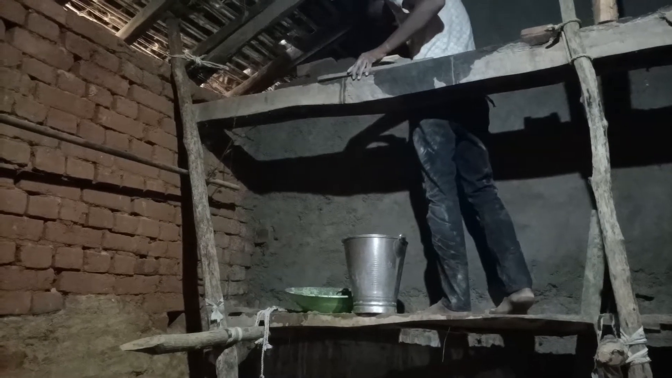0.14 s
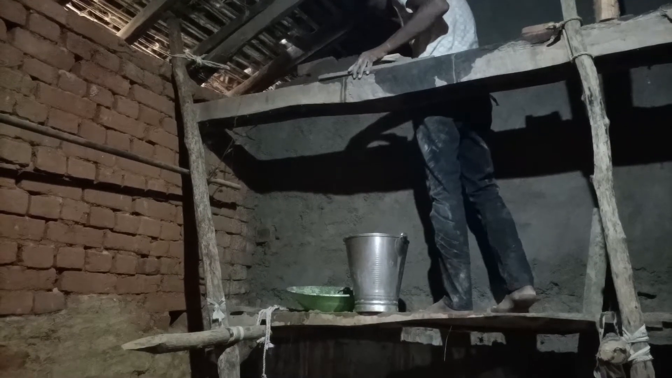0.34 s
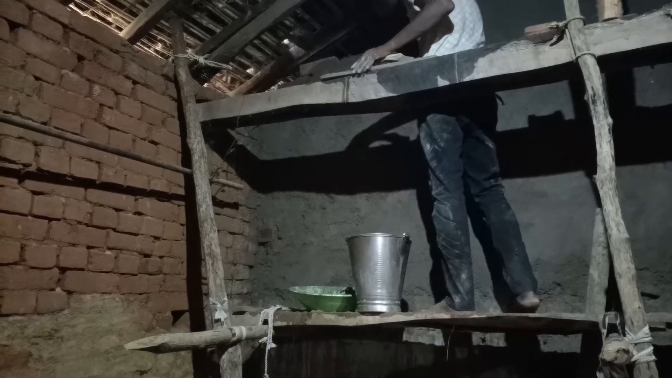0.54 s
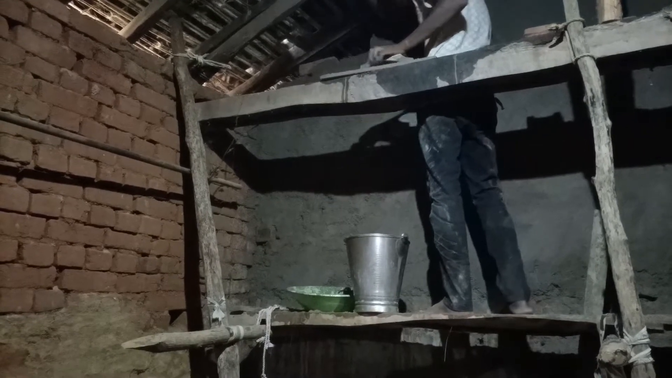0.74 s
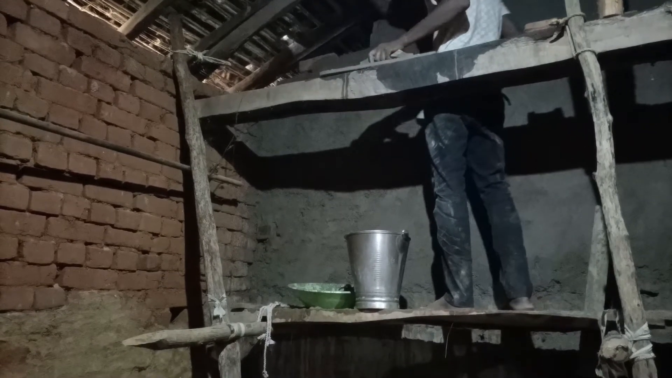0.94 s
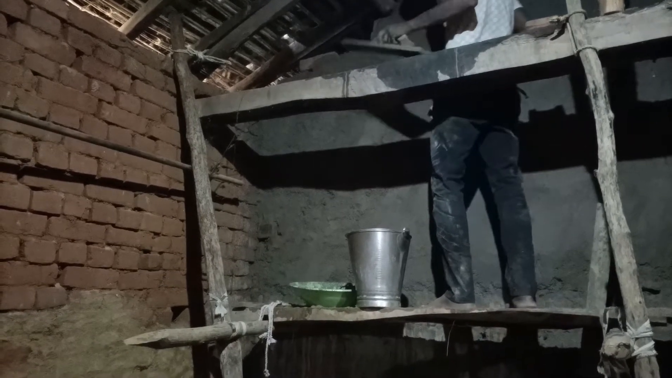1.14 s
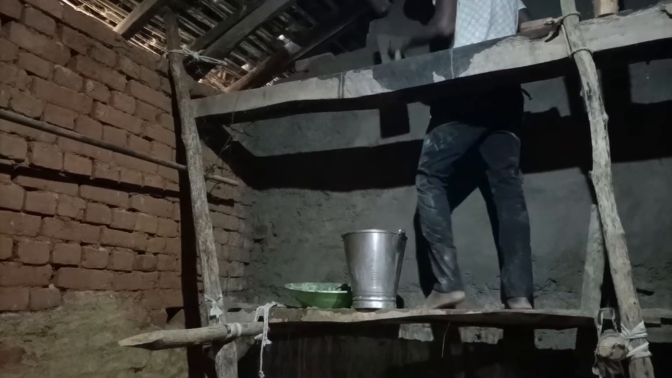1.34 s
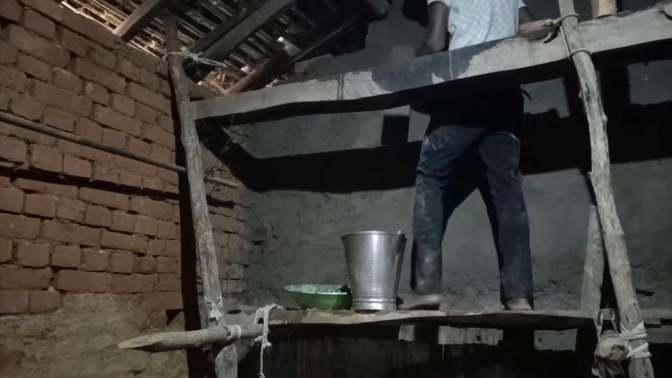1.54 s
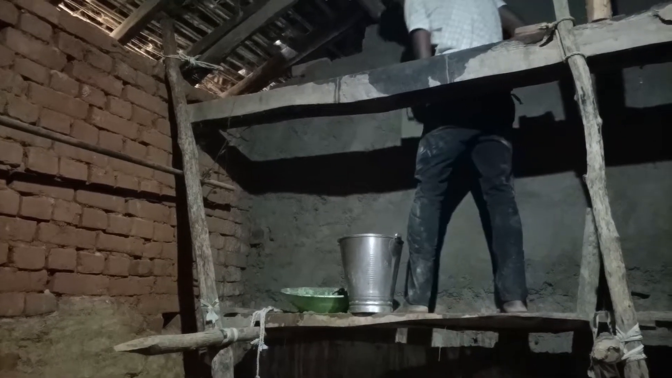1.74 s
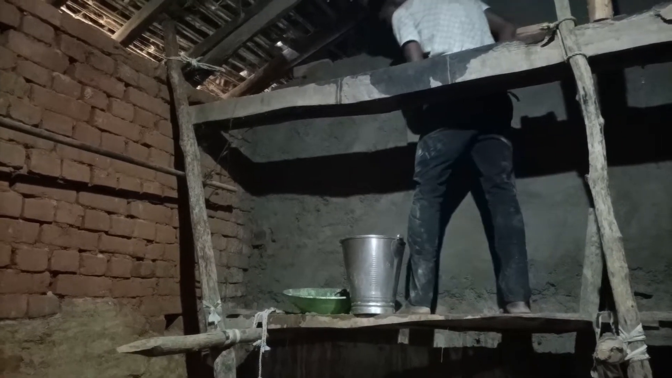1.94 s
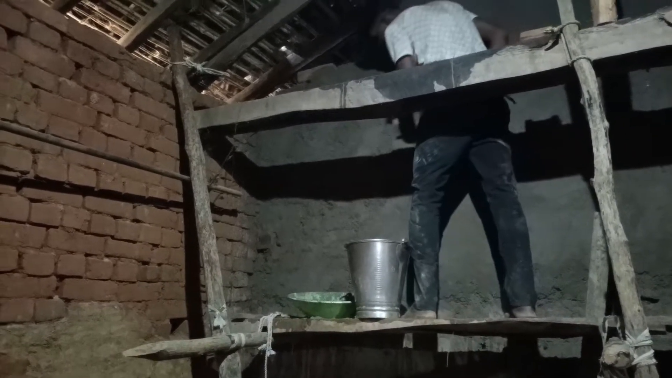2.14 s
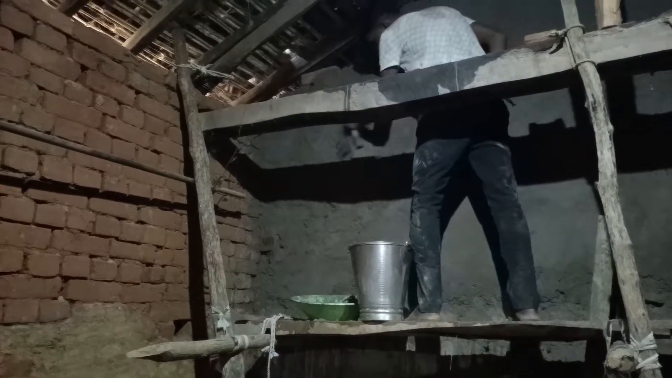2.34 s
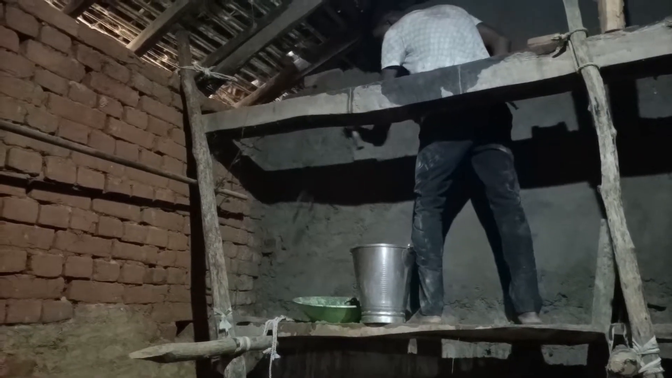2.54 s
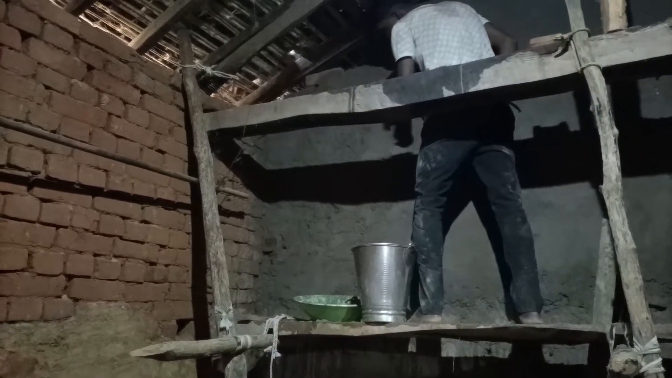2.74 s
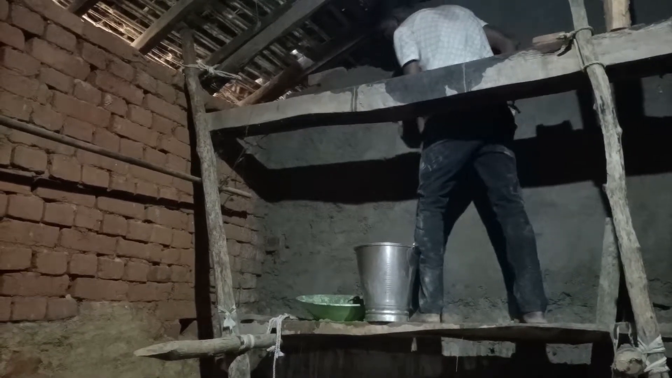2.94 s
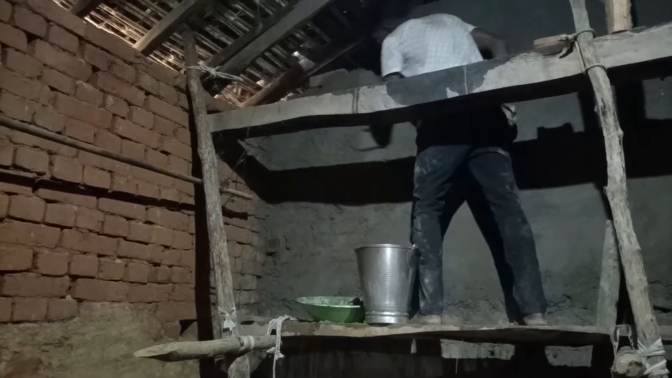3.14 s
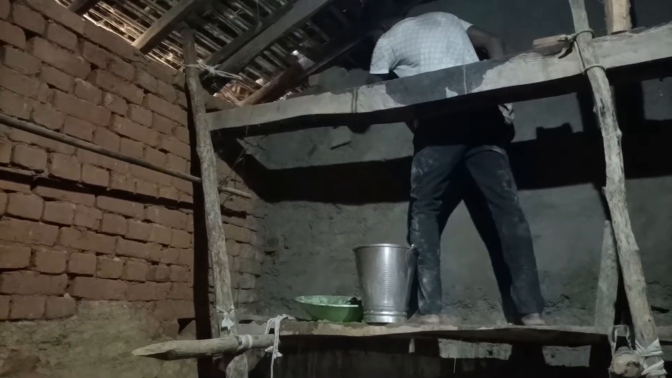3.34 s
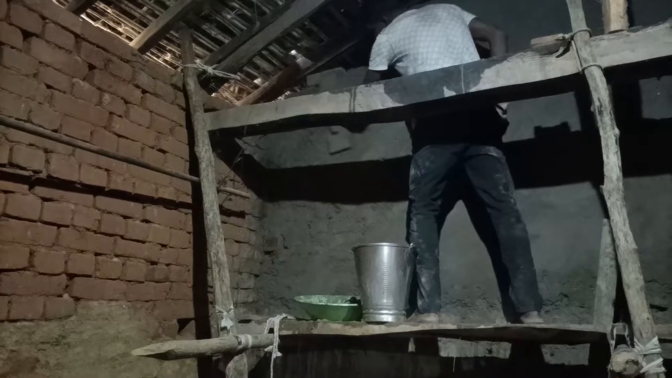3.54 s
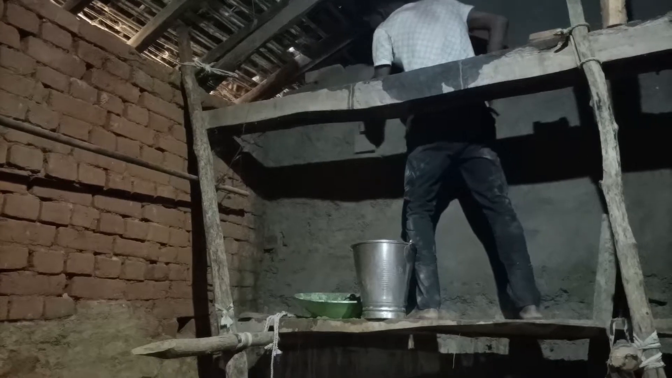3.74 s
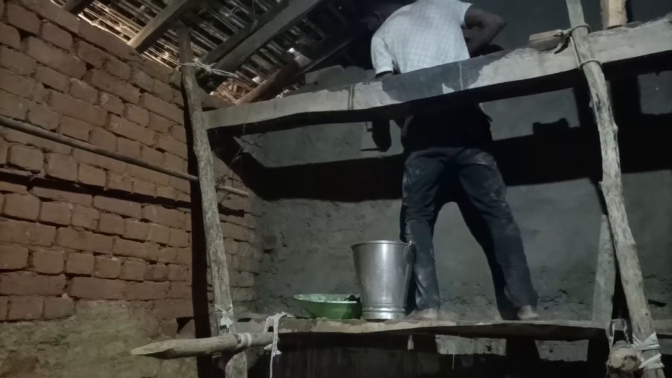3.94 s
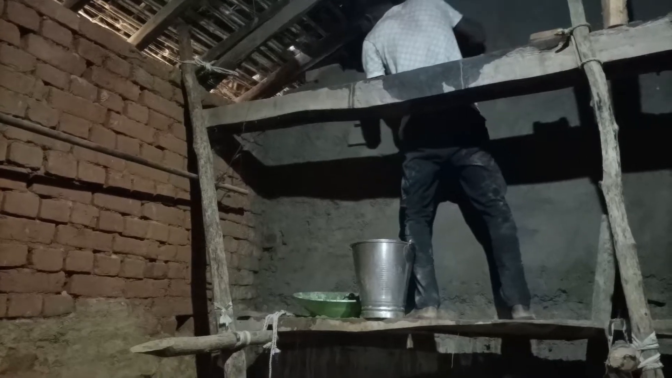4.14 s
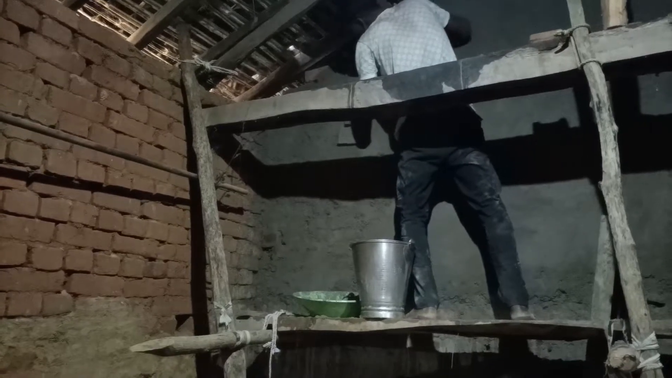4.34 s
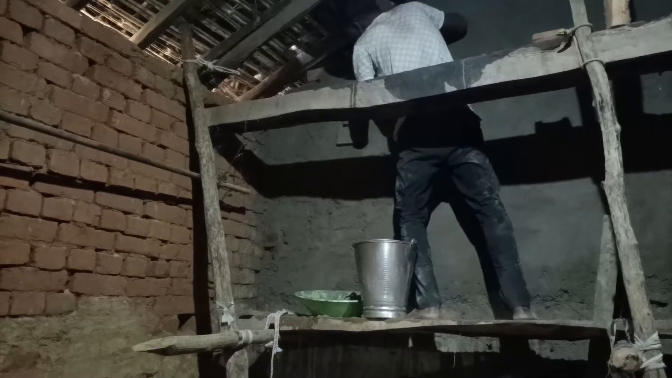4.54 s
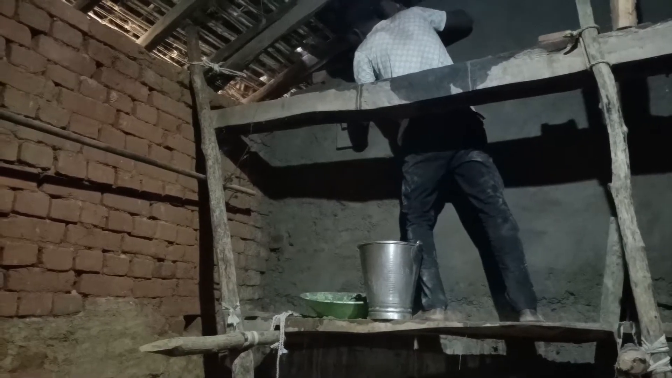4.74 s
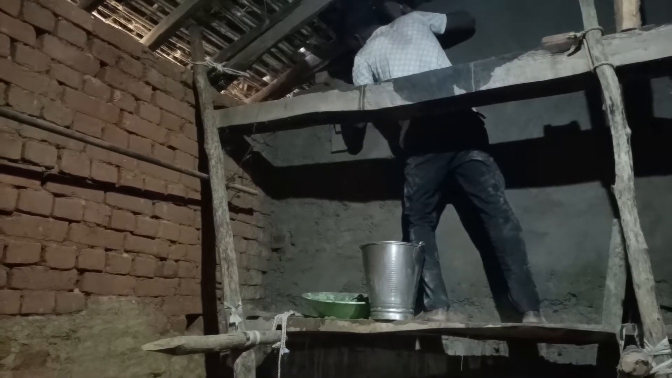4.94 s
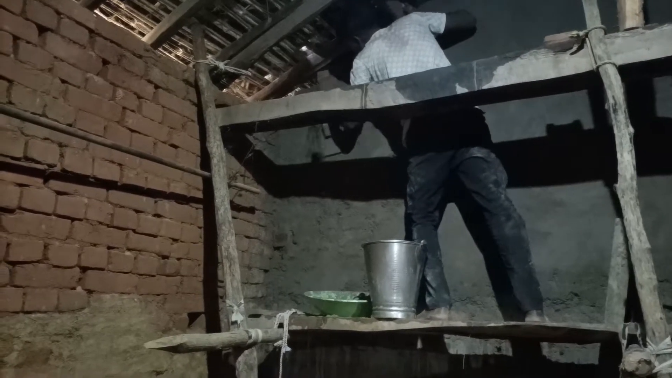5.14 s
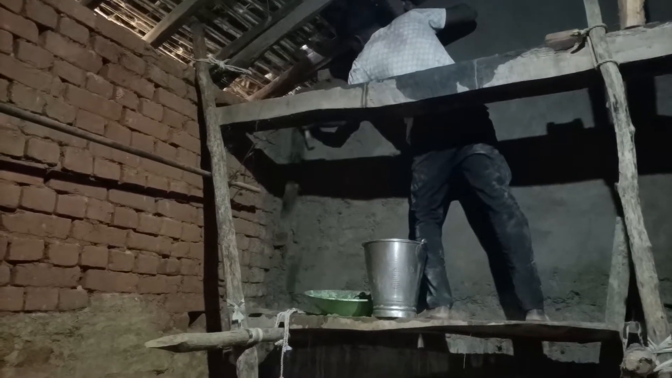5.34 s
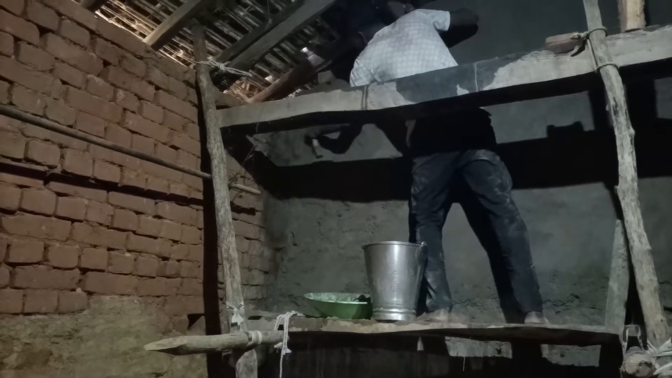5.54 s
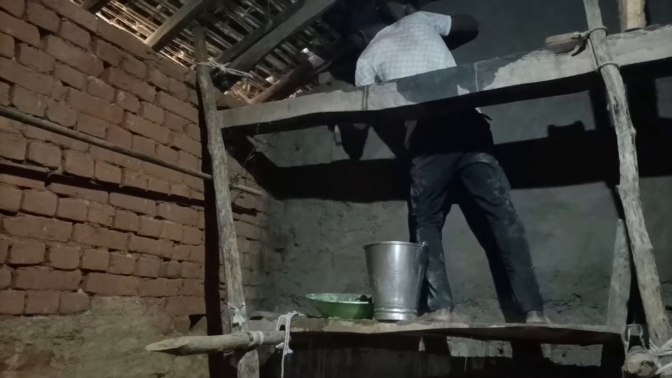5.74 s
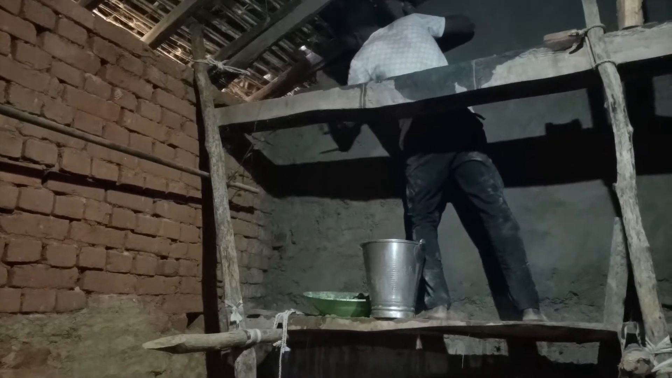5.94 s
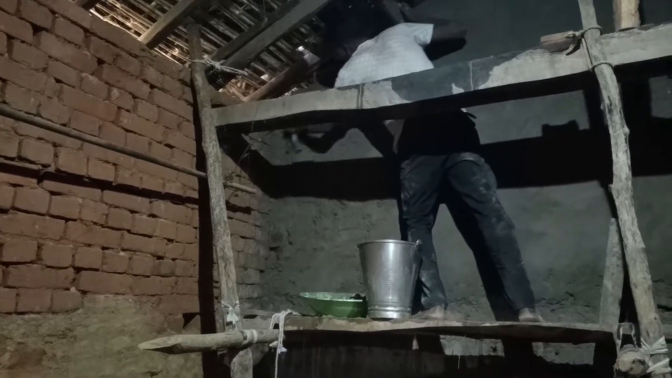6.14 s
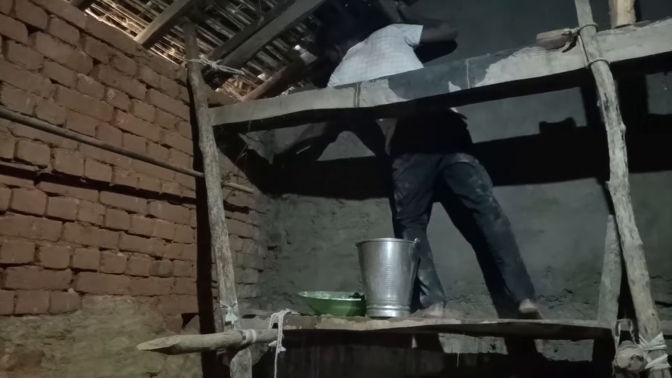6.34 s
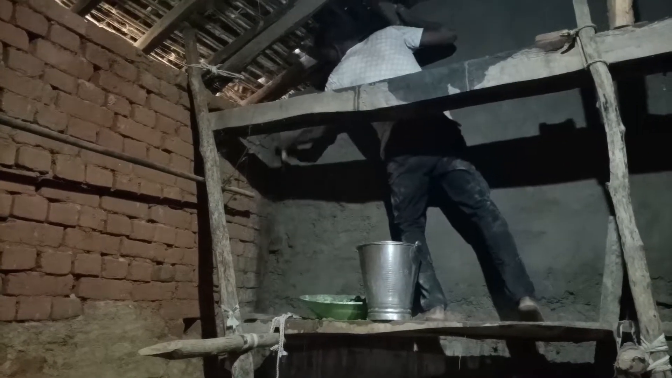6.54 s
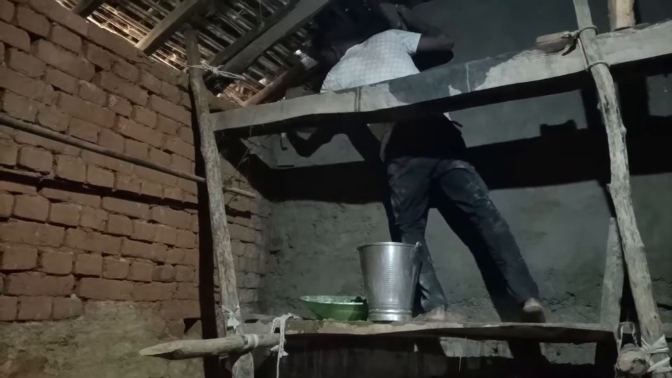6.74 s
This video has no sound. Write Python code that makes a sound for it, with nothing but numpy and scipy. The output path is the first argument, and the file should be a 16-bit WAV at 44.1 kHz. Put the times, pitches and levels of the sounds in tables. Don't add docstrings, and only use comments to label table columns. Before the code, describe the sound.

Light, dry trowel skims open quietly, followed by a small steel ring and faint touches. Then working strokes begin: grainy, mid-bright scraping of wet sand and plaster, with a hard catch at three seconds. Rubbing grows denser and muffled knocks from the concrete ledge cluster around four and six seconds, with fizzing sand on top. Close, fairly dry brick room, stereo pickup, low soft rumble and slight hiss beneath.

```python
import sys
import numpy as np
from scipy import signal
from scipy.io import wavfile
from scipy.ndimage import uniform_filter1d

SR = 44100
rng = np.random.default_rng(int(sys.argv[2]) if len(sys.argv) > 2 else 0)


def bounce(signal):
    frames = np.transpose(np.atleast_2d(signal))
    limited = np.clip(frames, -1, 1)
    pcm = np.round(limited * 32767).astype(np.int16)
    wavfile.write(sys.argv[1], SR, pcm)


def invert_db(x):
    u = np.asarray(x, float) / 20
    return 10 ** u


N = 299439

# start in seconds, peak in dB, fizz in dB re peak,
# body pitch in Hz, body level in dB re peak.
CATCHES = [(0.3013, -36.5, 8.5, 2940, 0), (0.402, -27, -2, 2300.0, -20), (0.623, -44, 2, 2600.0, -6),
           (0.738, -49, 3, 3500, -10), (0.796, -50, 11, 4320, 5), (1.43, -46.5, -27, 1320, 6),
           (1.571, -59, 5, 1580.0, -12), (1.653, -30.5, -8, 1630, 0), (1.8525, -28.5, -9, 2520, 3.5),
           (1.929, -22, -16, 1600.0, -1), (2.9494, -29.5, 16.5, 2405, -10.0),
           (3.009, -12, -14, 2640.0, -27), (3.058, -9.5, -5, 870, -5), (3.785, -30.5, 17.5, 2500, -10),
           (3.89, -35, 12, 2500, -10), (4.0662, -15.5, -12, 2350, -3), (4.5421, -15.5, -14, 1000, -8),
           (4.569, -20, -2, 960, -3), (4.587, -24, -10, 2800, 3), (4.6244, -15, -12, 1300, -2),
           (4.633, -24, -12, 1000, -2), (4.706, -24, -12, 1100, -1), (5.519, -24, 7.5, 4500, 1),
           (5.543, -25, 7, 1150, -4), (5.698, -11, 3.5, 1000.0, -6), (5.8, -16.5, 8.5, 800, -4),
           (5.9214, -18, 10, 810, 5.5), (6.026, -22.5, 9, 2020, 6), (6.08, -22.5, -11.0, 930, 9.5),
           (6.553, -8, -2, 2450.0, -17.0), (6.6195, -21, 5, 2110.0, -5)]
CATCH_T60 = 0.14
# start in seconds, peak in dB, pitch in Hz, t60 in seconds.
THUDS = [(0.112, -39, 337, 0.096), (0.301, -42, 352, 0.048), (0.399, -42.5, 221, 0.072),
         (1.438, -54, 412, 0.6), (1.855, -48, 200, 0.076), (1.968, -37, 145, 0.092),
         (3.06, -21, 435, 0.086), (3.784, -31, 450, 0.085), (4.149, -26, 241, 0.084),
         (4.288, -19, 290, 0.069), (4.626, -37, 500, 0.091), (5.534, -25.5, 150, 0.062),
         (5.697, -14.5, 237, 0.07), (5.816, -11.5, 293, 0.065), (5.922, -23, 290, 0.075),
         (6.0815, -7.5, 237, 0.049), (6.123, -19, 266, 0.086), (6.209, -18, 356, 0.067),
         (6.252, -11.5, 335, 0.066), (6.265, -15, 267, 0.085), (6.283, -32, 243, 0.046),
         (6.328, -27, 320, 0.044), (6.552, -15.5, 176, 0.073), (6.618, -20, 238, 0.064)]
# frequency in Hz, width in Hz, level in dB.
SLAB_MODES = [(175.7, 26, 6.5), (237, 16, 4.5), (314, 39, 7.5), (424, 340, -3), (496, 15.5, 5.5)]
# frequency in Hz, width in Hz, level in dB.
PRESSED_MODES = [(510, 12, -6), (658, 36, 9.5), (850, 310, -5.5), (1190, 530, 8.5), (1656, 45, 8),
                 (2440, 75, 3), (4450, 130, 5), (6100, 490, 3.5)]
# frequency in Hz, width in Hz, level in dB.
FLAT_MODES = [(1180, 960, 7.5), (2420, 90, 2.5), (4480, 100, 5), (6010, 75, 0)]


def evened(x):
    return x / np.sqrt(np.mean(np.atleast_2d(x).mean(0) ** 2) + 1e-20)


def read(points, hz):
    f, value = np.transpose(points)
    return np.interp(np.log(hz + 1), np.log(f + 1), value)


def follow(rows):
    s, *columns = np.transpose(rows)
    return [np.interp(np.arange(N) / SR, s, c) for c in columns]


def chance(hz):
    size = max(int(SR / hz), 1)
    smooth = uniform_filter1d(rng.standard_normal(N), size)
    return evened(uniform_filter1d(smooth, size))


def add(mix, s, sound):
    part = mix[..., round(s * SR):][..., :sound.shape[-1]]
    part += sound[..., :part.shape[-1]]


def strike(db, t60, rise_s, length_s):
    t = np.arange(round(length_s * SR)) / SR
    return invert_db(db - 60 * t / (t60 + 0.00075)) * (1 - np.exp(-t / rise_s))


def ring(hz, db, t60, rise_s, length_s):
    shape = strike(db, t60, rise_s, length_s)
    t = np.arange(len(shape)) / SR
    damping = np.clip((length_s - t) / 0.036, 0, 1)
    return shape * np.sin(2 * np.pi * hz * t) * damping


def settle(power, t60):
    keep = invert_db(-120 / (t60 * SR))
    return signal.lfilter([1 - keep], [1, -keep], power, zi=[keep * power[0]])[0]


def sliding(peaks, hz, frames, wander):
    if len(peaks) == 0:
        return 0
    drift = uniform_filter1d(rng.standard_normal((len(peaks) + 1, frames)), size=9, axis=1)
    drift = drift / drift.std()
    hills = 0
    for (f, width, db), swell in zip(peaks, drift[1:]):
        hill = 1 / (1 + (2 * (hz - f) / width) ** 2)
        hills = hills + np.outer(hill, db * (1 + 0.4 * swell))
    place = np.outer(np.arange(len(hz)), 1 + wander * drift[0])
    place = np.clip(place, 0, len(hz) - 1).astype(int)
    return np.take_along_axis(hills, place, axis=0)


def noise(shape, patchy_db, ripple_db, tilt=None, peaks=(), wander=0.03, size=2048, lively=None):
    # frequency in Hz, left-right correlation 0-1.
    likeness = [(30, .9), (90, .88), (180, .92), (350, .88), (700, .68), (1400, .36), (3000, .22),
                (6000, 0)]
    # frequency in Hz, left minus right in dB.
    lean = [(30, 2.5), (200, -0.2), (500, -2), (1200, -0.2), (1800, 1), (2740, 1.3), (4190, 3.5),
            (6410, 10), (7500, -4), (9810, -2.5), (12000, -1), (15000, 30)]
    # time in seconds, left delay in seconds.
    delay = [(0, -45e-6), (3.4, -30e-6), (4.2, 45e-6), (6.79, 70e-6)]
    hop = size // 4
    frames, hz = N // hop + 5, np.fft.rfftfreq(size, 1 / SR)
    at = np.minimum(np.arange(frames) * hop, N - 1)
    a, b, c, d, patches, ripple = rng.standard_normal((frames, len(hz), 6)).T
    patches = uniform_filter1d(uniform_filter1d(patches, size=14, axis=0), size=8, axis=1)
    ripple = uniform_filter1d(uniform_filter1d(ripple, size=2, axis=0), size=11, axis=1)
    depth = 1 if lively is None else lively[at]
    level_db = read(shape, hz)[:, None] + depth * sliding(peaks, hz, frames, wander)
    level_db = level_db + patchy_db * patches / patches.std() + ripple_db * ripple / ripple.std()
    if tilt is not None:
        level_db = level_db + np.log2((hz[:, None] + 1) / 2800) * tilt[at]
    level_db = level_db - 10 * np.log10(np.mean(invert_db(level_db) ** 2, axis=0))
    same = np.clip(read(likeness, hz), -1, 1)[:, None]
    left = a + 1j * b
    z = np.array([left, same * left + np.sqrt(1 - same ** 2) * (c + 1j * d)])
    lag = np.interp(np.arange(frames) * hop / SR, *np.transpose(delay))
    low = size // 8
    z[1, :low] *= np.exp(2j * np.pi * np.outer(hz[:low], lag))
    z = z * invert_db(level_db) * invert_db(np.outer([.5, -.5], read(lean, hz)))[:, :, None]
    return evened(signal.istft(z, nperseg=size, noverlap=size - hop)[1][:, :N])


def background():
    # time in seconds, sway in dB.
    sway = [(0, -85), (.13, -74), (1.85, -71.5), (1.92, -61.5), (2.84, -73.5), (3.14, -59), (3.7, -74),
            (4.07, -69), (4.2, -59), (4.5, -69.5), (5.45, -74), (5.56, -48), (5.98, -58), (6.28, -49.5),
            (6.47, -78), (6.54, -53), (6.79, -67.5)]
    # frequency in Hz, level in dB per Hz.
    hiss = [(59, -38), (100, 12), (535, 1.5), (872, -1.5), (1010, -3), (1200, -3.5), (6020, -9),
            (7610, -40), (14400, -18), (15700, -21), (15900, -60)]
    # time in seconds, pitch in Hz, level in dB.
    bird = [
        (1.383, 4670, -80),
        (1.405, 4930, -68),
        (1.43, 4770, -74),
        (1.45, 4700, -74),
    ]
    hiss_db, air_db = -72.5, -66
    boards_db, = follow(sway)
    air_db = air_db + 0.33 * (boards_db - boards_db.mean())
    air = noise([(5, -43), (18, 21), (45, 8), (70, -28)], 0.68, .4, size=4096)
    boards = noise([(30, -44), (55, 13.5), (120, 3.5), (170, -25)], 0.53, 0.47, size=4096)
    hz, db = follow(bird)
    s = np.arange(N) / SR
    sounding = (s > bird[0][0]) * (s < bird[-1][0])
    chirp = invert_db(db) * np.sin(2 * np.pi * np.cumsum(hz) / SR) * sounding
    out = invert_db(air_db) * air + invert_db(boards_db) * boards
    return out + invert_db(hiss_db + 0.5) * noise(hiss, 1.0, 0.36) + chirp


def bursts(extra_db, rise_s, stretch):
    power = np.zeros(N)
    for (s, db, *_), more_db in zip(CATCHES, np.broadcast_to(extra_db, len(CATCHES))):
        add(power, s, strike(db + more_db - 21.0, CATCH_T60 * stretch, rise_s, .5) ** 2)
    return power


def hand():
    # fastest moment, rise and fall in seconds,
    # scrape in dB, pressure on the slab 0-1.
    touches = [
        (0.103, 0.41, 0.14, -39.5, 0.44),
        (0.481, 0.098, 0.065, -41.5, 0.05),
        (0.813, 0.027, 0.073, -64, 0.2),
        (1.055, 0.026, 0.018, -61, 0.4),
        (1.316, 0.07, 0.026, -67, 0.2),
        (1.487, 0.043, 0.0075, -51.5, 0.96),
        (1.729, 0.12, 0.098, -67.5, 0.1),
        (1.952, 0.03, 0.016, -43, 0.4),
        (1.98, 0.15, 0.11, -50, 0.4),
        (2.076, 0.11, 0.043, -55.5, 0.1),
    ]
    # fastest moment, rise and fall in seconds, scrape in dB, pressure 0-1.
    strokes = [(2.393, 0.364, 0.169, -32.0, 0.3), (2.715, 0.172, 0.221, -34.7, 0.0),
               (3.068, 0.261, 0.044, -40.5, 0.62), (3.214, 0.245, 0.211, -29.0, 0.64),
               (3.377, 0.088, 0.215, -34.3, 0.5), (3.725, 0.21, 0.31, -36.0, 0.1),
               (3.777, 0.088, 0.106, -36.4, 0.47), (4.07, .07, .06, -45, .2), (4.15, .075, .07, -34, .7),
               (4.233, 0.15, 0.081, -32, 0.85), (4.277, 0.022, 0.205, -33, 0.84),
               (4.544, 0.2, 0.14, -40.5, 0.6), (4.787, 0.3, 0.141, -44.0, 0.59),
               (5.0, 0.224, 0.574, -42.0, 0.6), (5.19, 0.199, 0.095, -38.5, 0.58),
               (5.318, 0.084, 0.351, -36.3, 0.6), (5.732, 0.163, 0.057, -33.5, 0.0),
               (5.813, 0.07, 0.062, -34.2, 0.92), (5.91, 0.068, 0.048, -33.5, 0.74),
               (6.119, 0.264, 0.026, -33.5, 0.89), (6.198, 0.156, 0.37, -29.0, 0.89),
               (6.551, 0.114, 0.057, -37.0, 0.6), (6.745, 0.208, 0.352, -36.0, 0.53)]
    light_db, heavy_db = -36.5, -3.5
    flat_top, roundness, bear = 2.2, 3.0, 5.1
    shove_db, shove_t60 = -22, 0.14
    settle_t60 = 0.14
    dust_db, hush_db, dust_back_s = -73.5, -68, 0.062
    t, power, slab = np.arange(N) / SR, np.zeros(N), np.zeros(N)
    for fastest, rise, fall, db, pressure in touches + strokes:
        away = np.maximum((fastest - t) / rise, (t - fastest) / fall)
        arch = 1 - np.clip(away, 0, 1) ** flat_top
        power = power + invert_db(db) ** 2 * arch ** roundness
        drag_db = light_db + (heavy_db - light_db) * pressure
        slab = slab + invert_db(db + drag_db) ** 2 * arch ** bear
    for s, db, _, _ in THUDS:
        add(slab, s, strike(db + shove_db, shove_t60, 0.0012, .3) ** 2)
    power, slab = settle(power, settle_t60), settle(slab, .5 * settle_t60)
    lately = settle(power + bursts(0, .001, 0.46), dust_back_s * 10)
    power = power + invert_db(dust_db) ** 2 / (1 + (lately / invert_db(hush_db) ** 2) ** 2) + 1e-12
    return 10 * np.log10(power), 10 * np.log10(slab + power * invert_db(light_db + 3.5) ** 2)


def grit():
    per_s, snap_db, snap_s = 400, -8, 0.0005
    size = (rng.random(N) < per_s / SR) * np.minimum(rng.exponential(1, N), 4)
    return evened(1 + invert_db(snap_db) * signal.lfilter([1], [1, -np.exp(-1 / (snap_s * SR))], size))


def sing(modes):
    shake = rng.standard_normal((3, N))
    shake = shake[:2] + 0.23 * shake[2]
    out = 0
    for hz, width, db in modes:
        swell = invert_db(db + 3.5 * chance(31))
        out = out + swell * signal.lfilter(*signal.iirpeak(hz, hz / width, SR), shake) / np.sqrt(width)
    return evened(out)


def singing_steel(bent):
    # frequency in Hz, width in Hz, level in dB.
    straight_modes = [(1405, 17, -15), (1780, 5.5, 5), (2110, 25, -12), (2527, 25, 10), (2860, 34, -16),
                      (3385, 63, 8.5)]
    # frequency in Hz, width in Hz, level in dB.
    bent_modes = [(1180, 37, -6), (1360, 22, -8), (1646, 72, -12), (2590, 140, -18), (3040, 64, -23),
                  (3400, 76, -2)]
    bowed = np.clip((bent - .35) / 0.44, 0, 1)
    return invert_db(-11.5) * (1 - bowed) * sing(straight_modes) + invert_db(-13.5) * bowed * sing(bent_modes)


def drumming_belly():
    # frequency in Hz, level in dB per Hz.
    belly = [(600, -29), (850, -14.5), (1200, -1.5), (1500, 0), (1850, -4), (2300, -38)]
    # time in seconds, level in dB re scrape.
    freedom = [(0, -12), (.07, -13.5), (.13, -3.5), (.22, -7.5), (.43, -17), (.5, -23), (1.9, -15),
               (2.2, -6.5), (2.7, -19), (2.9, -9.5), (3.1, -12.5), (3.22, -8), (3.7, -12), (4.15, -10.5),
               (5.0, -12.5), (5.7, -13.5), (6.22, -10), (6.42, -21)]
    return invert_db(follow(freedom)[0]) * noise(belly, 1.8, 2.8)


def rubbed_sand(pressing, moved, tilt, lively):
    # frequency in Hz, level in dB per Hz.
    sand = [(530, -49), (900, -10.5), (1520, -3), (1650, -0.5), (1910, 0), (2510, 5), (5040, -1),
            (6080, -1), (7600, -8.5), (9880, -9.5), (16700, -120)]
    # frequency in Hz, width in Hz, level in dB.
    skim_modes = [(870, 98, 10), (1190, 48, 2), (1480, 230, 4), (1740, 150, 18), (2020, 77, -14),
                  (2350, 79, 10.5), (2600, 86, -11), (3440, 99, -2), (6100, 1100, 1.5)]
    out = (1 - pressing) * noise(sand, 1.5, 2.2, tilt, skim_modes, .01, lively=lively)
    out += (pressing - moved) * noise(sand, 0.9, 3.16, tilt, PRESSED_MODES, lively=lively)
    return out + moved * noise(sand, 0.16, 1.9, tilt, FLAT_MODES, lively=lively)


def flexing_blade(moved, lively):
    # frequency in Hz, level in dB per Hz.
    bending = [(280, -14.5), (480, 4.5), (586, -2.5), (652, 2), (1200, -2), (1560, -46), (2640, -120)]
    out = (1 - moved) * noise(bending, 2.5, 3.5, None, PRESSED_MODES, lively=lively)
    return out + moved * noise(bending, 2.5, 3, None, FLAT_MODES)


def dragged_slab():
    # frequency in Hz, level in dB per Hz.
    wall = [(65, -43), (110, -40), (167, -2), (300, 4.5), (416, 0), (650, -2), (840, -61), (1430, -120)]
    # frequency in Hz, level in dB per Hz.
    edge = [(65, -51), (110, -25.5), (226, -6), (486, -2.5), (586, -4.5), (650, -22), (840, -69),
            (1430, -120)]
    near = np.clip(np.arange(N) / SR - 4.5, 0, 1)
    out = near * noise(wall, 0.22, 1.8, None, SLAB_MODES, 0)
    return out + (1 - near) * noise(edge, 1.0, 2.8, None, SLAB_MODES, 0)


def trowel():
    # time in seconds, steepness 0-1, bend 0-1.
    grip = [(0, 0.58, 0.02), (.51, 0.65, 0.14), (1.84, 0.55, 1), (1.92, 0, 0), (2.19, 0.21, 0.58),
            (2.45, 0.36, 0.8), (2.78, 0.06, 0.27), (2.97, 0.73, 0.4), (3.12, 0.32, 0.87),
            (3.72, 0.42, 0.42), (4.2, 0.52, 0.99), (4.65, 0.39, 0.58), (5.1, 0.38, 0.71),
            (5.37, 0.36, 0.93), (5.66, 0.38, 0.43), (5.85, 0.69, 0.68), (6.5, 0.36, 0.97),
            (6.7, 0.38, 0.56)]
    # time in seconds, resonance left 0-1, singing in dB.
    deadening = [(0, .4, 0), (.13, .8, 0), (.4, .15, 0), (.49, .9, 0), (.8, .2, 0), (1.9, .8, 0),
                 (2.45, .7, 0), (2.7, .6, 3), (2.9, .7, 0), (3.08, .35, -3), (3.5, .4, -3), (3.7, .5, 6),
                 (3.92, .5, 7), (4.1, .7, -3), (5, .8, 0), (5.6, .8, 0), (6.05, .5, -3), (6.79, .6, 0)]
    # frequency in Hz, level in dB per Hz.
    fine_sand = [(4000, -46), (6800, 3), (7600, -7.5), (10100, 6), (12700, 5), (14100, -0.5), (15500, -7.5),
                 (16000, -70)]
    # end of the skims in seconds, move toward the wall in seconds.
    changes = (0.44, 4.05)
    pressing, moved = (np.clip((np.arange(N) / SR - s) / 0.077, 0, 1) for s in changes)
    scrape_db, drag_db = hand()
    steep, bent = follow(grip)
    lively, sing_db = follow(deadening)
    fizz_db = -16.5 + (4.5 + 16.5) * steep
    fizz_db = fizz_db + 0.13 * pressing * (np.maximum(scrape_db, -50) + 50.0)
    tilt = -3 + (7.5 + 3) * steep
    flex_db = -27.5 + (-6 + 27.5) * bent
    crackle_db = 0.3 * chance(210) + 0.56 * chance(37)

    catch_fizz_db = np.transpose(CATCHES)[2]
    ticks = bursts(2, 0.00049, .22)
    scrape = np.sqrt(invert_db(scrape_db) ** 2 + bursts(0, 0.0047, 1.23) + ticks)
    fizz = np.sqrt(invert_db(scrape_db + fizz_db) ** 2 + bursts(catch_fizz_db, 0.00093, 1.0))

    sand = rubbed_sand(pressing, moved, tilt, lively)
    sand += pressing * invert_db(sing_db) * singing_steel(bent)
    sand += drumming_belly()
    snaps = grit()
    out = scrape * invert_db(crackle_db) * snaps * sand
    out += fizz * snaps ** 0.51 * invert_db(1.7 * crackle_db) * noise(fine_sand, 0.29, 1.3, size=1024)
    out += invert_db(scrape_db + flex_db + 0.59 * crackle_db) * flexing_blade(moved, lively)
    lumps_db = 1.7 * chance(104)
    return out + invert_db(drag_db + 0.5 + lumps_db) * dragged_slab()


def knocks():
    # start in seconds, peak in dB, pitch in Hz.
    lumps = [(3.077, -25, 430), (3.117, -27, 500), (3.141, -35, 510), (3.166, -45, 494),
             (3.207, -33.5, 419), (3.241, -31.5, 354), (3.379, -28.5, 439.7), (3.445, -30, 568),
             (4.128, -29, 340), (4.156, -28, 400), (4.168, -25, 284), (4.185, -31, 400), (4.196, -20, 410),
             (4.211, -19, 400), (4.219, -23, 460), (4.232, -30, 395), (4.246, -33, 425), (4.277, -30, 424),
             (4.304, -31, 324), (4.32, -25, 277), (4.354, -43, 376), (4.544, -33, 1000), (4.571, -27, 950),
             (4.6255, -27, 620), (4.633, -28, 560), (4.645, -34, 640), (5.331, -33, 570), (5.361, -31, 561),
             (5.711, -27, 232), (5.723, -18, 260), (5.729, -22, 260), (5.771, -40, 270), (5.738, -32, 261),
             (5.751, -28, 270), (5.803, -18.5, 242), (5.825, -21.5, 280), (5.834, -19.5, 266),
             (5.882, -39, 283), (5.898, -35, 266), (5.935, -35, 342), (6.027, -26, 305), (6.036, -26, 310),
             (6.045, -34, 323), (6.102, -23, 308), (6.13, -16, 332), (6.148, -33, 397), (6.158, -24, 274),
             (6.185, -25.5, 344), (6.226, -20, 304), (6.241, -14, 296), (6.302, -34, 317),
             (6.316, -21, 280), (6.338, -19.5, 340), (6.357, -32, 350), (6.395, -27, 298),
             (6.415, -27, 304), (6.561, -28, 250), (6.572, -34, 184), (6.636, -28, 240)]
    out = np.zeros((2, N))
    for s, db, _, hz, body_db in CATCHES:
        shape = strike(db + body_db - 20.5, 0.9 * CATCH_T60, 0.0013, 0.3)
        band = signal.butter(2, [hz / 1.3, hz * 1.22], "bandpass", fs=SR)
        body = signal.lfilter(*band, rng.standard_normal((2, len(shape))))
        add(out, s, shape * evened(body))
    for s, db, hz, t60 in THUDS:
        add(out, s, -ring(hz, db + 0.5, 0.5 * t60, 0.005, 0.1))
        for mode_hz, _, mode_db in SLAB_MODES:
            far_db = 12 * abs(np.log2(mode_hz / hz))
            add(out, s, ring(mode_hz, db + mode_db - 27 - far_db, 2.0 * t60, 0.0018, 0.18))
    for s, db, hz in lumps:
        add(out, s, -ring(hz, db + 0.5, 0.024, 0.0017, .09))
    return out


def blade():
    # frequency in Hz, level in dB, t60 in seconds.
    free_modes = [(453, -17, 0.47), (680, -12.5, .75), (834, -16, 0.58), (1620, -8.5, 0.58),
                  (2606, -4, 0.41), (3340, -12, 0.31), (4635, -6, 0.24), (3768, -9, 0.26), (5250, -2, 0.25)]
    # start in seconds, damped at in seconds, level in dB.
    lifts = [
        (0.511, 0.83, -45),
    ]
    # start in seconds, damped at in seconds, frequency in Hz, level in dB, t60 in seconds.
    pings = [(.17, 0.31, 834, -58, 0.56), (0.476, 0.57, 1640, -46, 0.59), (.605, 0.81, 2606, -59, .3),
             (.482, .54, 1760, -41, .3), (1.44, 1.52, 1360, -57, 0.28), (1.445, 1.52, 910, -62, .3),
             (1.649, 1.68, 1630, -48, 0.18), (1.65, 1.7, 1260, -55, .15), (2.87, 2.946, 660, -49, 0.6),
             (2.988, 3.046, 450, -45, 0.25), (3.012, 3.03, 650, -40, 0.62), (3.59, 3.7, 430, -48, .3),
             (3.67, 3.78, 1800, -45, 0.66), (2.708, 2.6, 1400, -55, .5), (1.041, 1.18, 1040, -63, 0.36),
             (1.257, 1.4, 1024, -74, 0.83), (1.053, 1.1, 1580, -60, 0.15), (1.7, 1.84, 844, -71, .6),
             (1.857, 1.92, 676, -57, 0.37), (1.932, 2.04, 670, -53, 0.34), (1.935, 2.3, 1500, -40.5, 0.14),
             (2.375, 2.45, 662, -37.5, 0.68), (2.452, 2.5, 770, -44, .4), (2.595, 2.8, 680, -54.5, 3.9),
             (3.781, 3.8, 451, -34, 0.3), (3.808, 3.84, 454, -36, .3), (3.836, 3.84, 440, -38.5, .3),
             (3.914, 3.7, 690, -61, 0.46), (3.88, 3.8, 1040, -40, .3), (0.21, .285, 2600, -59, .3),
             (5.65, 6.7, 1110, -44, .6), (2.36, 2.42, 570, -43, .3), (3.74, 3.8, 2300, -44, .4),
             (3.7, 3.8, 2575, -40, .9), (3.83, 3.945, 2560, -40, .7), (1.956, 2.05, 65, -46.5, 0.18),
             (3.063, 3, 65, -44.5, 0.24), (5.524, 5.702, 69.3, -43.5, 1.1), (5.525, 5.67, 140, -45, .45),
             (6.562, 6.5, 86, -37, 0.25)]
    out = np.zeros(N)
    for s, end, lift_db in lifts:
        for hz, db, t60 in free_modes:
            add(out, s, ring(hz, db + lift_db, t60, 0.025, end - s))
    for s, end, hz, db, t60 in pings:
        add(out, s, ring(hz, db, t60, 0.0024, end - s))
    return np.array([out, np.roll(out, 2)])


def scene():
    return background() + trowel() + knocks() + blade()


def low_pass(x):
    return signal.sosfilt(signal.butter(12, 15840, fs=SR, output="sos"), x)


def record(dry):
    return low_pass(dry)


dry = scene()
out = record(dry)
bounce(out)
```